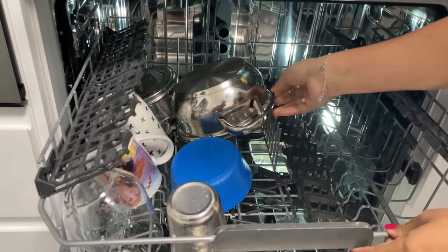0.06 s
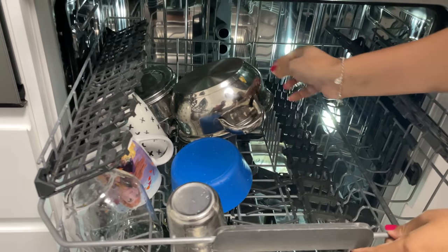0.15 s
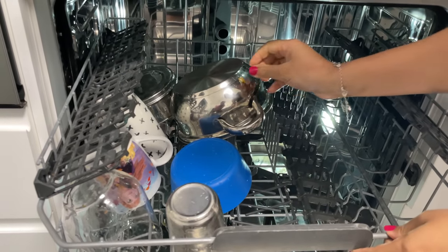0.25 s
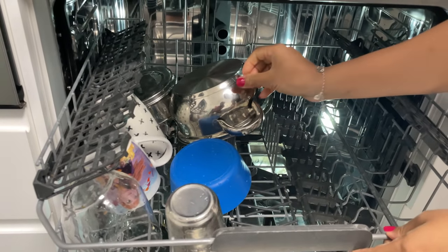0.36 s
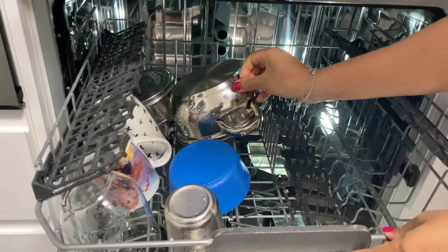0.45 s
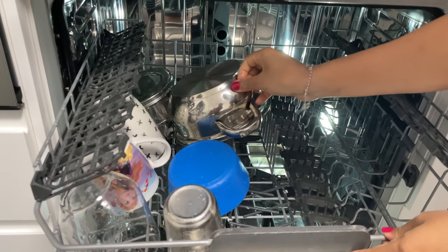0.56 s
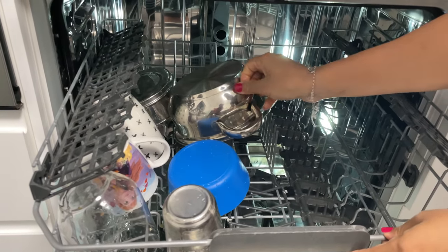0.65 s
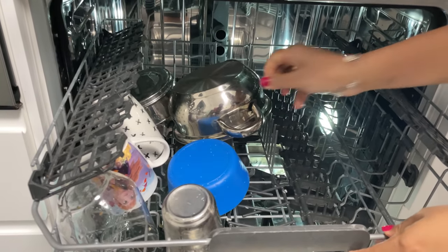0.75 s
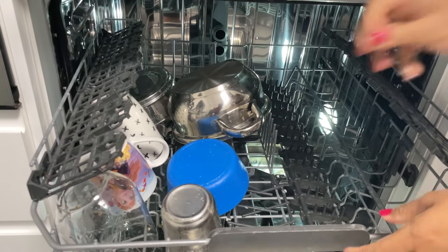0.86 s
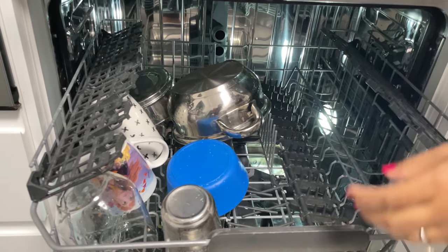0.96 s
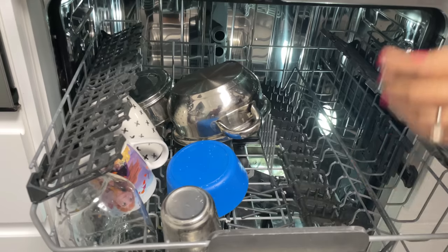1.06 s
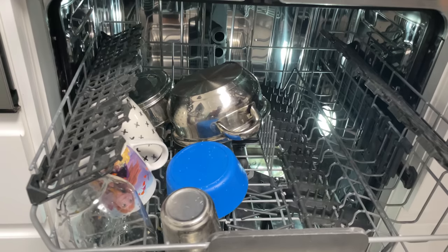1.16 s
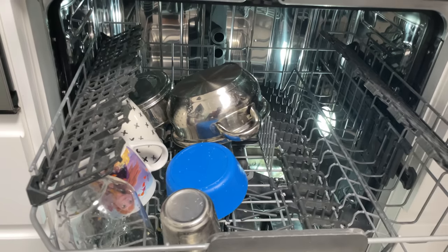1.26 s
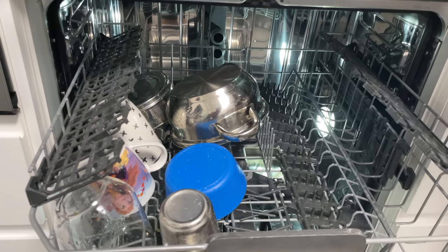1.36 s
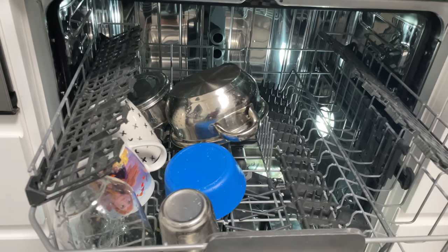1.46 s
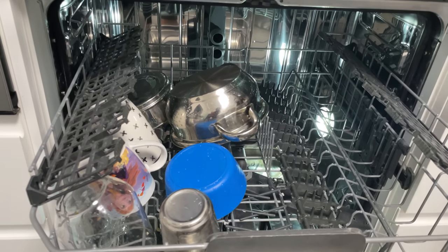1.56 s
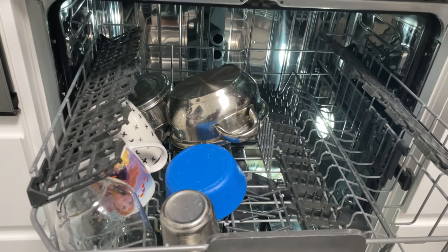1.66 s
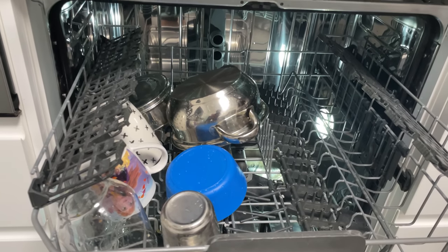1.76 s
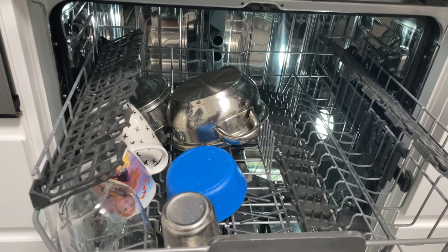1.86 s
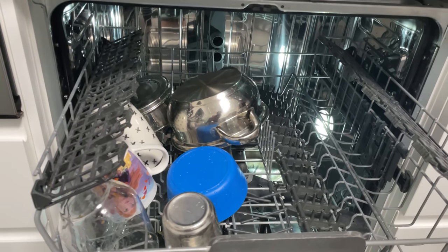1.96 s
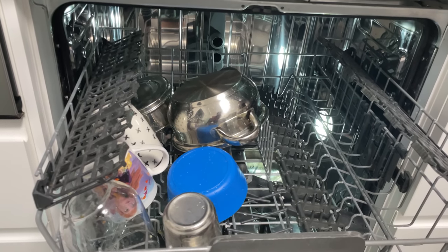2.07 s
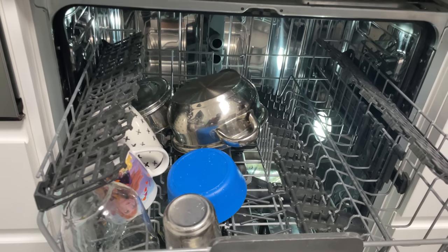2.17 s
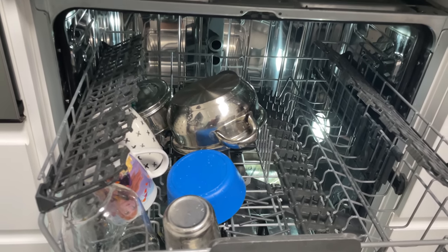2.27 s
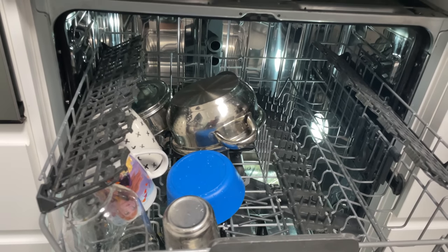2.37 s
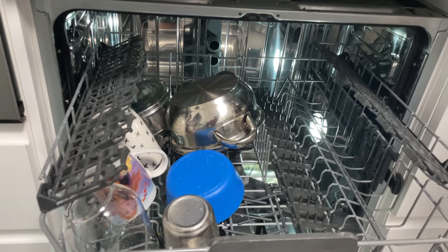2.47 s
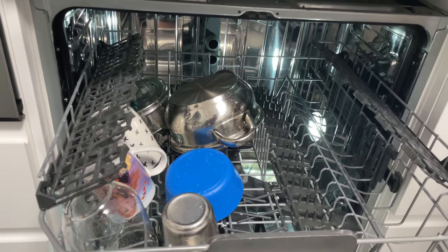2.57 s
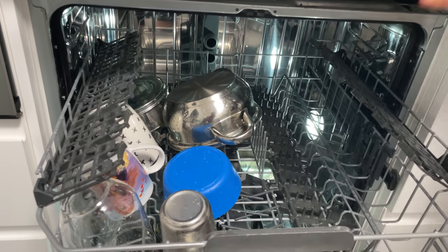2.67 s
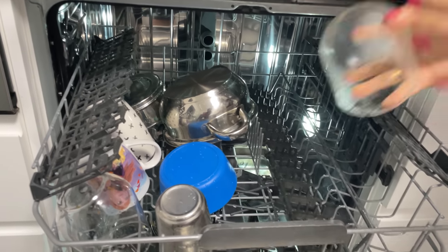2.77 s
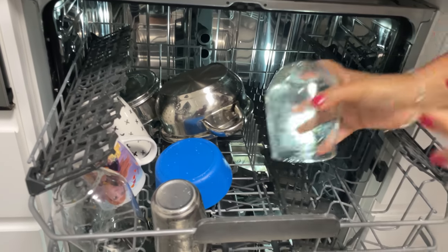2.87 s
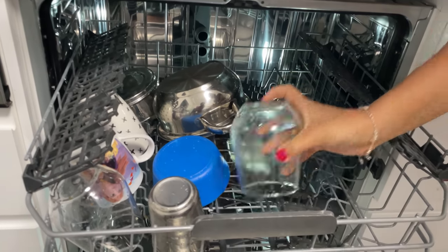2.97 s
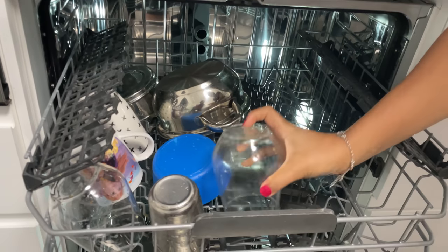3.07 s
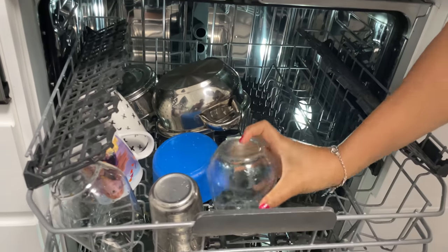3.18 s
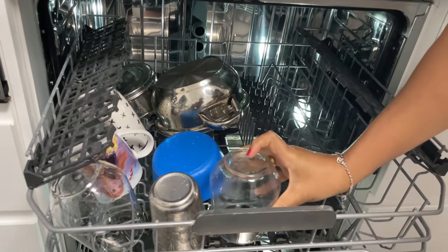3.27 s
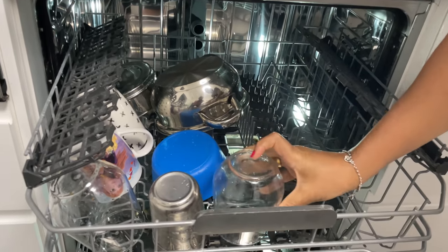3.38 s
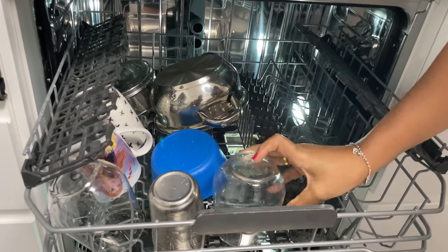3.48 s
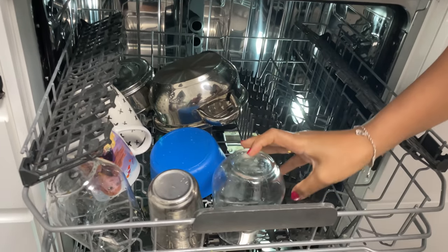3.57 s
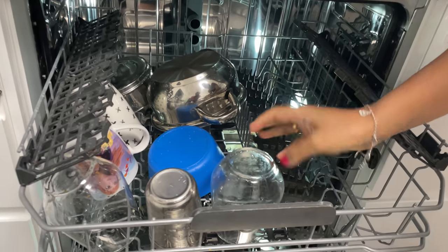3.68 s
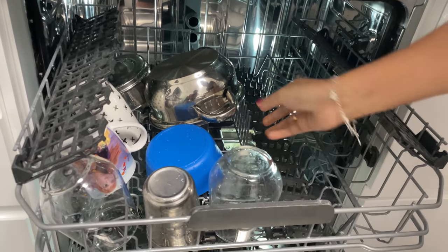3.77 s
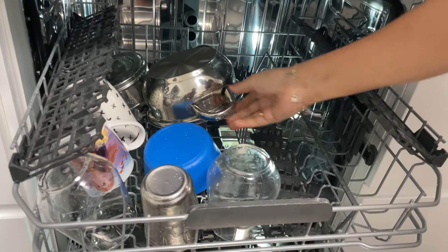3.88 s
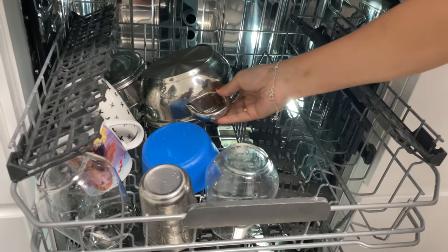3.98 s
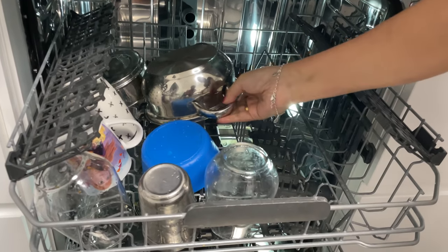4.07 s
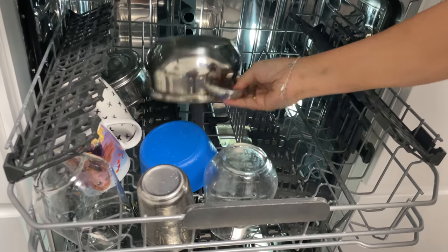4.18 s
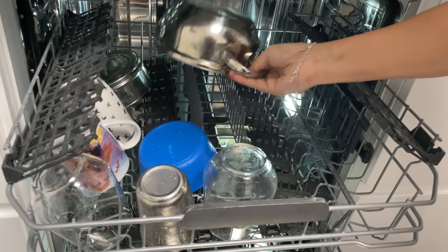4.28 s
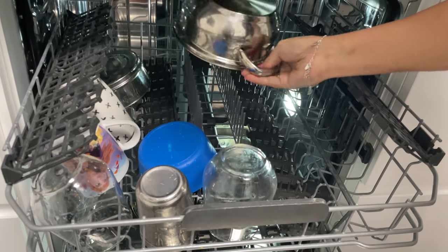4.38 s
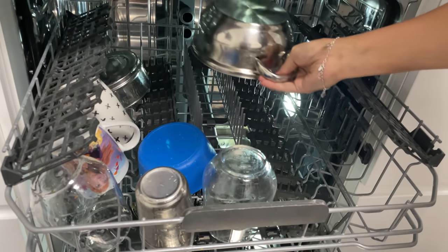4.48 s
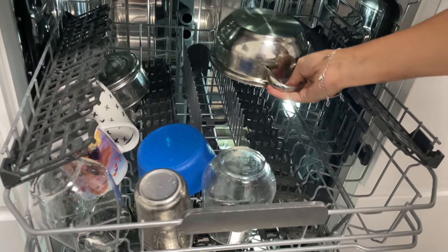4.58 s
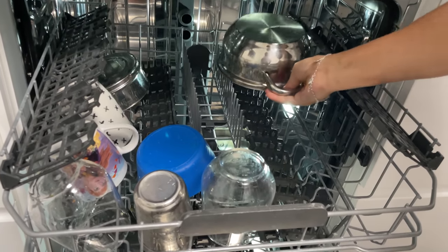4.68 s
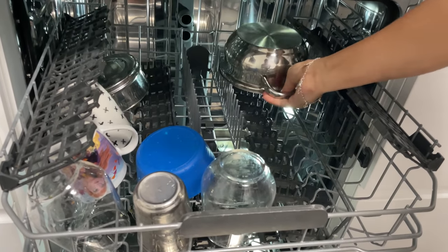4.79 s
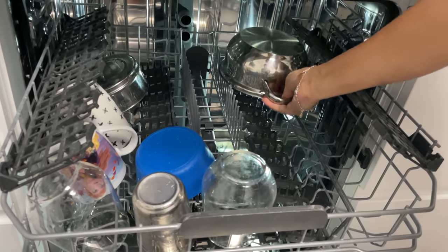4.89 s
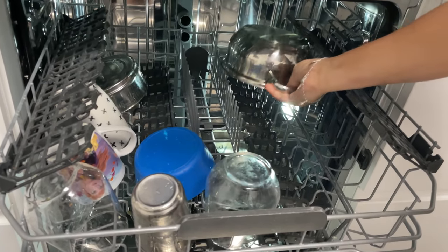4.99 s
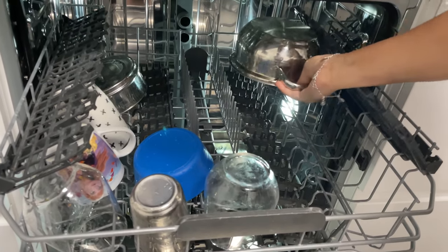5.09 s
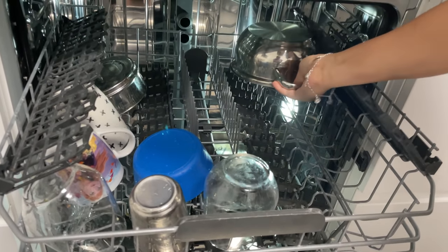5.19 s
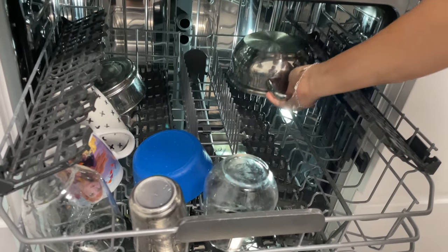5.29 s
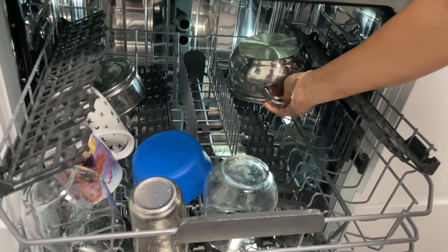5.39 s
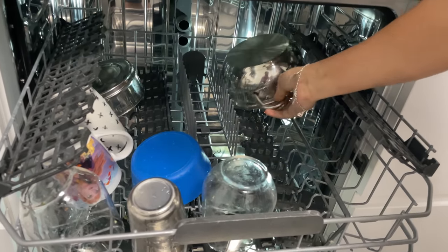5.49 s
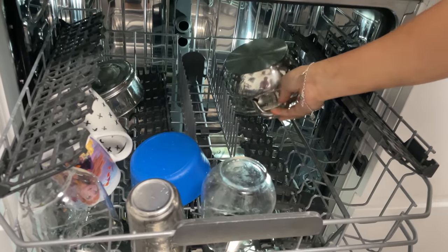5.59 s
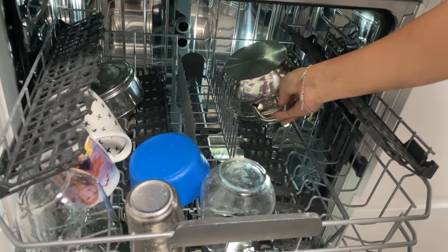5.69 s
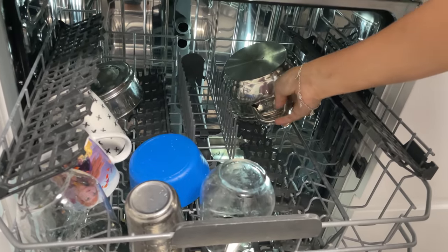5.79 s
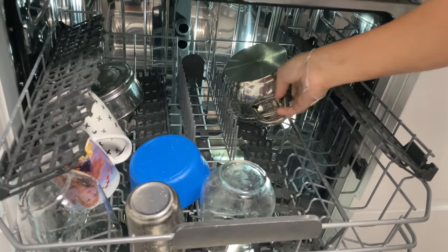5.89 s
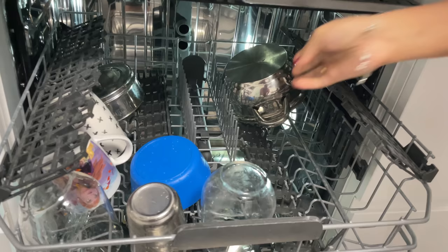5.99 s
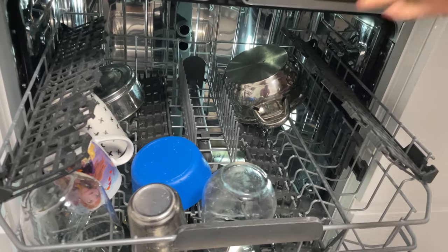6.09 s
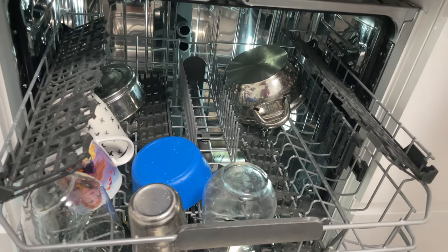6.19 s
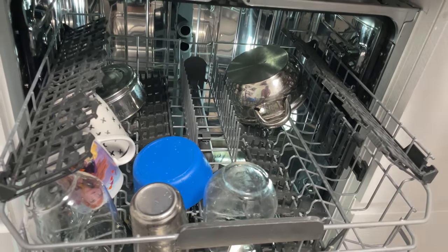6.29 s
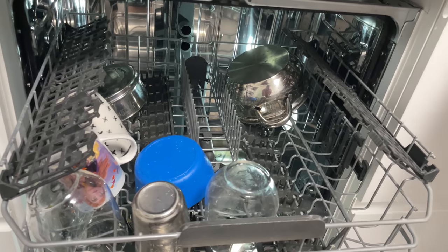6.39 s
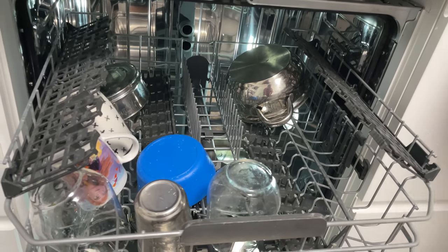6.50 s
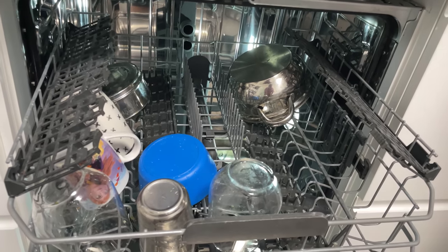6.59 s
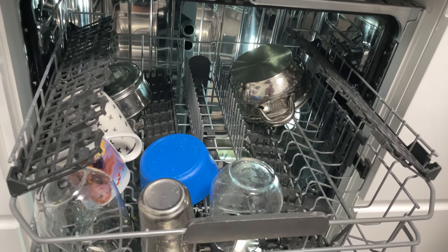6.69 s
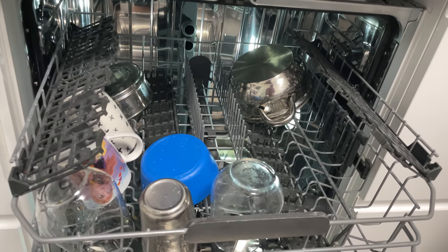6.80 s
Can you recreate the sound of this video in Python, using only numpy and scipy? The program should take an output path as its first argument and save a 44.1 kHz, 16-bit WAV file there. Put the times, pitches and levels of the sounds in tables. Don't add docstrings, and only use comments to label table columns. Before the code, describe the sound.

A close stereo phone microphone catches dishes being arranged in a wire rack: quiet pot knocks, a tiny bracelet clink, a muffled distant drawer, a sharp clatter of steel bowls, a short glassy double clink, then a dense run of pot bangs, scrapes and thuds with booming rails. Hands rub softly between; a dry rustle of rollers ends it in the short kitchen reverberation.

```python
import sys
import numpy as np
from scipy import signal
from scipy.fft import rfft, irfft, next_fast_len
from scipy.io import wavfile

SR = 44100
rng = np.random.default_rng(int(sys.argv[2]) if len(sys.argv) > 2 else 0)


def materialize(psi):
    bounded = np.clip(np.atleast_2d(psi).T, -1, 1)
    quanta = np.round(bounded * 32767).astype(np.int16)
    wavfile.write(sys.argv[1], SR, quanta)


def boost(x):
    u = np.asarray(x, float) / 20
    return 10 ** u


N = 302085

# tone_hz, level_db, ring_s (time to fall 60 dB)
POT_TILTED = [(536.7, -10, 0.3), (607, -9, 0.3), (727, -10, 0.44), (894, -11, 0.5), (1689, 1.5, 0.25),
              (2840, -15, 0.3), (3440, -11, 0.4), (3900, -16, 0.2), (4870, -24, 0.3), (5600, -20, 0.048)]
# tone_hz, level_db, ring_s
RIM_CLINK = [(3793, -3.5, .2), (7140, -5.5, .3), (8800, -3.5, .3), (10200, 0, 0.33), (11300, -2.5, .25),
             (12300, -10, .2)]
# pitch_hz, level_db
DULL = [(150, -53), (250, -23.5), (831, 1), (1000, -14.5), (3460, -19), (7440, -66), (10900, -37.5),
        (16000, -94)]
# pitch_hz, level_db
DRY = [(150, -35), (250, -8.5), (910, -6), (1800, -2.5), (3620, -8.5), (5410, -9), (13600, -20),
       (16200, -63)]
# pitch_hz, level_db
HEAVY = [(180, -13.5), (1490, -10.5), (1690, -0.5), (2310, -14), (3460, -9), (5800, -26.5), (12500, -30),
         (16200, -83)]
# pitch_hz, level_db
SHARP = [(120, -31), (200, -8), (856, -8), (2300, -6), (3400, -11), (6500, -8), (11000, -8), (16200, -50)]


def along(points, hz):
    f, v = np.transpose(points)
    return np.interp(np.log(hz + 1), np.log(f + 1), v)


def unit(x):
    return x / np.sqrt(np.mean(x ** 2) + 1e-20)


def filtered(x, response):
    m = next_fast_len(x.shape[-1] + 4096)
    spectrum = rfft(x, m) * response(np.fft.rfftfreq(m, 1 / SR))
    return irfft(spectrum, m)[..., :x.shape[-1]]


def pair(length, colour):
    # pitch_hz, likeness (0 to 1)
    likeness = [(60, 0.94), (150, 0.91), (380, 0.58), (950, 0.068), (2400, 0.2), (6000, 0.26), (9000, 0.3),
                (12500, 0.51)]

    def mid_side(hz):
        turn = np.arccos(np.clip(along(likeness, hz), 0, 1)) / 2
        return colour(hz) * [np.cos(turn), np.sin(turn)]

    mid, side = filtered(rng.standard_normal((2, length)), mid_side)
    return unit(np.array([mid + side, mid - side]))


def dying(noise, t60):
    hz, t, z = signal.stft(noise, SR, nperseg=128)
    decay = np.exp(-np.log(1000) * t / t60(hz)[:, None])
    return signal.istft(z * decay, SR, nperseg=128)[1][..., :noise.shape[-1]]


def grit(length, rate, depth_db):
    knots = rng.standard_normal(int(length * rate / SR) + 4)
    wander = np.interp(np.arange(length) * rate / SR, np.arange(len(knots)), knots)
    return unit(boost(depth_db * wander))


def resonances(modes):
    def response(f):
        return sum((-1) ** k * boost(db) * 1j * f * width / (centre * centre - f * f + 1j * f * width)
                   for k, (centre, width, db) in enumerate(modes))
    return response


def echo(x, wet_db):
    # pitch_hz, fade_s (60 dB)
    kitchen = [(200, 0.92), (1000, 0.54), (4000, 0.57), (9000, 0.4), (14000, 0.26)]
    tail = dying(pair(SR // 2, np.ones_like), lambda hz: along(kitchen, hz))
    tail = np.pad(tail / np.linalg.norm(tail[0]), ((0, 0), (int(.004 * SR), 0)))
    return boost(wet_db) * signal.fftconvolve(x[None], tail, axes=1)


def clatter(contacts, modes, colour, pan_db, wet_db, damping, rise, wiry_db=6, split=.003, early=.78, crack=0):
    # pitch_hz, times_life
    rattle_fade = [(300, 1.42), (2000, 1.166), (6000, 0.91), (13000, 0.98)]
    crack_s = .005
    out = np.zeros((2, N + SR))
    t = np.arange(SR * 9 // 25, dtype=np.float32) / SR
    hz, level_db, t60 = np.transpose(modes).astype(np.float32)[:, :, None]
    turn, neper = np.float32(2 * np.pi), np.float32(np.log(1000))

    wires_hz = np.linspace(0, 16400, 600)
    wires_db = wiry_db * wires_hz / (wires_hz + 3000) * rng.standard_normal(600)

    def shade(f):
        return boost(along(colour, f) + np.interp(f, wires_hz, wires_db))

    centre = np.sin(turn * hz * t)
    struck = np.exp(-neper * t / (damping * np.minimum(t60, 1.2)))
    struck = struck + early * np.exp(-neper * t / 0.024)
    shape = (1 - np.exp(-t / rise)) * np.cos(np.pi / 2 * (t / t[-1]) ** 1.3)
    pan = np.array([[pan_db], [-pan_db]]) / 2
    for s, db, life, ring_db in contacts:
        draw = np.clip(rng.standard_normal((4, *hz.shape)), -2, 2).astype(np.float32)
        split_hz = (8 + split * hz) * np.abs(draw[:2]) * [[[1]], [[-1]]]
        beside = np.sin(turn * (hz + split_hz).astype(np.float32) * t).sum(0)
        strength = boost(ring_db - 14 + level_db - level_db.max() + 1.5 * draw[2])
        rings = strength * struck * (centre + 0.62 * beside)
        lean = boost(2.2 * draw[3]).T[0]
        ringing = grit(len(t), 70, 2.2) * [lean @ rings, (1 / lean) @ rings]

        noise = dying(pair(len(t), shade), lambda f: max(life, .01) * along(rattle_fade, f))
        rattle = boost(-7.5) * grit(len(t), 300, 3.5) * noise
        direct = ((1 + crack * np.exp(-t / crack_s)) * rattle + ringing) * shape
        out[:, round((s - rise) * SR):][:, :len(t)] += boost(db + pan) * direct
    first = round((contacts[0][0] - rise) * SR)
    last = round(contacts[-1][0] * SR) + len(t)
    tail = echo(out[0, first:last], wet_db)[:, :N + SR - first]
    out[:, first:first + tail.shape[1]] += tail
    return out[:, :N]


def hum():
    # pitch_hz, level_db
    hum_colour = [(22, -31), (38, 1.5), (241, -14.5), (852, -14.5), (1500, -24.5), (8080, -38),
                  (12700, -30), (14500, -64.5)]
    return boost(-60.5) * pair(N, lambda f: boost(along(hum_colour, f)))


def rack():
    # peak_s, level_db
    shakes = [(.02, -42.5), (.17, -39), (.72, -43.5), (1.78, -44), (1.88, -32.5), (2.12, -44.5),
              (2.279, -43), (2.85, -56), (3.1, -56.5), (3.352, -33.5), (3.58, -41.5), (3.78, -45.5),
              (4.05, -43.5), (4.17, -36), (4.32, -36), (4.432, -19), (4.702, -38.5), (4.86, -30.5),
              (5.07, -34.5), (5.22, -37.5), (5.42, -36.5), (5.64, -35), (5.8, -38.5), (6.649, -51),
              (6.8, -47.5)]
    # pitch_hz, width_hz, level_db
    rails = [(85.2, 17, -11), (52.5, 20, -16.5)]
    # pitch_hz, width_hz, level_db
    panels = [(124.3, 33, -1), (170.6, 57, 0), (246, 240, -4)]
    rise_s, rails_t60_s, panels_t60_s, panels_db = .015, 0.79, 0.42, -2
    s, db = np.transpose(shakes)[:, :, None]
    late = np.arange(0, N, 64) / SR - s

    def swell(t60):
        fall = np.maximum(late / t60, -late / rise_s / 6)
        energy = np.sum(boost(2 * db - 120 * fall), 0)
        return np.interp(np.arange(N) / SR, late[0] + s[0], np.sqrt(energy))

    boom = pair(N, lambda f: resonances(rails)(f) ** 2)
    thud = pair(N, lambda f: resonances(panels)(f) ** 2)
    return swell(rails_t60_s) * boom + boost(panels_db) * swell(panels_t60_s) * thud


def thumps():
    # start_s, peak_db, pitch_hz, fade_s (60 dB)
    hits = [
        (0.15, -30, 82.5, .27),
        (0.721, -34, 78, .27),
        (1.86, -16.5, 130.3, .3),
        (2.255, -27, 130.6, .27),
        (4.423, -16, 340, .08),
        (4.426, -12, 185, .12),
        (4.441, -7, 98, .25),
        (5.635, -27.5, 86.2, .27),
        (5.72, -28, 290, .2),
        (6.668, -33, 85, .15),
    ]
    out, t = np.zeros(N + SR), np.arange(SR // 2) / SR
    for s, db, hz, t60 in hits:
        cycles = hz * (.88 * t + .12 * .05 * (1 - np.exp(-t / 0.055)))
        swing = boost(db - 60 * t / t60) * (1 - np.exp(-t / 0.0062)) * np.sin(2 * np.pi * cycles)
        out[round(s * SR):][:len(t)] += swing
    return out[:N]


def shuffle():
    # peak_s, swell_s, fade_s (both over 30 dB), level_db, brightness_db
    strokes = [(0.0, .1, 0.01, -38, -6), (0.55, 0.29, 1.1, -66.5, 11), (0.86, 0.64, 0.48, -56, -3),
               (1.68, 0.23, 1, -52, 0), (1.84, .25, 0.44, -42, 0), (2.92, 0.25, 0.5, -49.5, 2),
               (4.58, 0.4, 1.1, -35, -3.5), (5.2, .3, 0.46, -44, -2), (6.1, 0.42, .8, -60, -4),
               (6.62, 0.09, .5, -53, -4), (6.84, .3, 2, -37.5, 2)]
    now = np.arange(N) / SR
    low = pair(N, lambda f: boost(along(DRY, f)) / (1 + (f / 6000) ** 4))
    high = pair(N, lambda f: boost(along(DRY, f)) / (1 + (7500 / (f + 1)) ** 4))
    dark, bright = np.zeros((2, N))
    for s, swell, fade, db, tilt_db in strokes:
        stroke = boost(db - 4 - 30 * np.maximum((s - now) / swell, (now - s) / fade))
        dark = dark + boost(-tilt_db) * stroke
        bright = bright + boost(tilt_db - 9) * stroke
    return grit(N, 300, 2.5) * (dark * low + bright * high)


def far_drawer():
    # start_s, peak_db, rattle_s, ring_db
    knocks = [
        (1.404, -33, 0.12, -7),
        (1.439, -43, 0.066, -12),
    ]
    # tone_hz, level_db, ring_s
    wood = [(400, -6, .12), (980, 0, .1), (1750, 0, .15), (2100, -4, .1)]
    # pitch_hz, level_db
    muffled = [(150, -32), (400, -6), (884, -2), (1300, -10), (1800, 2), (3400, -7), (4500, -24),
               (8270, -48)]
    return clatter(knocks, wood, muffled, wiry_db=3, pan_db=0.0, wet_db=-1.0, damping=.5, rise=0.0018)


def bracelet():
    # start_s, peak_db, rattle_s, ring_db
    clinks = [
        (.629, -53, 0.026, 5.4),
    ]
    # tone_hz, level_db, ring_s
    link = [(4700, 0, 0.24)]
    return clatter(clinks, link, DRY, pan_db=4.0, wet_db=-9, damping=1.0, rise=0.0021)


def wire_tap():
    # start_s, peak_db, rattle_s, ring_db
    taps = [
        (0.948, -36, 0.06, -5),
    ]
    # tone_hz, level_db, ring_s
    prong = [(2000, 0, .06), (3250, -3, .04), (5100, -5, .04)]
    return clatter(taps, prong, HEAVY, pan_db=0.0, wet_db=3.5, damping=.8, rise=.0007, wiry_db=2.5)


def rollers():
    # start_s, peak_db, rattle_s, ring_db
    ticks = [
        (2.878, -26.5, 0.016, -23),
        (2.893, -32, .03, -24),
        (2.9957, -26, 0.014, -22),
        (3.138, -38, .02, -26),
        (6.765, -26, 0.026, -25),
    ]
    # start_s, peak_db, rattle_s, ring_db
    rustles = [
        (6.603, -38, 0.22, -30),
        (6.64, -41, .15, -30),
    ]
    # tone_hz, level_db, ring_s
    roller = [(5410, 2, 0.02), (2200, 0, 0.024)]
    # pitch_hz, level_db
    papery = [(200, -8), (800, -4), (2600, -16), (4000, -20), (5400, 4), (7000, -12), (13600, -22),
              (16200, -62)]
    return (clatter(ticks, roller, DRY, pan_db=0.0, wet_db=6.5, damping=0.34, rise=.0005, wiry_db=2.5)
            + clatter(rustles, roller, papery, pan_db=2.0, wet_db=-2, damping=.4, rise=.004, wiry_db=5))


def resting_pots():
    # start_s, peak_db, rattle_s, ring_db
    knocks = [
        (0.005, -31, 0.19, 0),
        (0.034, -30.5, 0.13, 3),
        (0.046, -34.5, 0.14, 3.5),
        (0.098, -30.5, 0.15, -2),
        (0.122, -33.5, 0.1, 0),
        (0.146, -32.5, 0.097, -3),
    ]
    # tone_hz, level_db, ring_s
    nested = [(517, -10, 0.5), (650, -3, 0.3), (750, -3, 0.3), (880, 0, 0.28), (1680, -6, 0.35),
              (1780, -6, .3), (2008, -11, .3), (2955, -16, .4), (3338, -11, .35), (3612, -16, 1.4),
              (3989, -14, .4), (4457, -12, .35), (4850, -19, .3), (6250, -16, .25)]
    # start_s, peak_db, rattle_s, ring_db
    nudges = [
        (0.68, -24, 0.13, 2.5),
        (0.699, -24, 0.063, -1.5),
    ]
    # tone_hz, level_db, ring_s
    resting = [(886, -6.5, 0.37), (1700, -3, 0.026), (1820, -29, 0.13), (2435, -24.5, 0.15),
               (2740, -29.5, 0.39), (3520, -30.5, 1.4)]
    return (clatter(knocks, nested, DRY, pan_db=0.2, wet_db=-2.5, damping=0.7, rise=0.0043, wiry_db=4)
            + clatter(nudges, resting, DULL, pan_db=-4.0, wet_db=-2.3, damping=0.52, rise=0.00059))


def steel_bowls():
    # start_s, peak_db, rattle_s, ring_db
    stacking = [(1.698, -33, 0.11, -17), (1.838, -26, .05, -10), (1.85, -7.5, 0.2, -5),
                (1.874, -11, 0.092, -6), (1.905, -17, .06, -3), (1.928, -16, .08, 3), (1.936, -13, 0.1, 3),
                (1.958, -15, .07, 2), (1.969, -18, 0.083, 2), (2.039, -25.5, 0.097, 4),
                (2.098, -30.5, 0.2, -4), (2.209, -33.5, 0.2, 0)]
    # tone_hz, level_db, ring_s
    bowl = [(2300, -14, 0.4), (2490, -13, 0.14), (3020, -24, 0.4), (4215, -2, 0.5), (4885, -18, 0.4),
            (6535, -14, 0.45), (7289, -21, 0.5), (7843, -13, .16), (8651, -19, .3), (9259, -17, .5),
            (10450, -20, .35), (11150, -14, .25), (12600, -17, .3), (13150, -19, .23)]
    # start_s, peak_db, rattle_s, ring_db
    settling = [
        (2.291, -21.5, 0.085, -3),
        (2.589, -51.5, 0.23, -3),
    ]
    # tone_hz, level_db, ring_s
    rim = [(940, -8, 0.38), (2300, -14, 0.7), (4195, -10, .8), (6480, -5, 0.3), (7230, -8, 0.28),
           (7800, -11, 0.25), (8700, -10, 0.3), (9609, -15, 0.27), (10580, -9, 0.3)]
    # pitch_hz, level_db
    bright = [(120, -41), (200, -8), (502, -6.5), (1790, -4), (9530, -11.5), (13000, -15), (16200, -102)]
    return (clatter(stacking, bowl, bright, pan_db=-0.9, wet_db=-1.5, damping=0.86, rise=0.0036)
            + clatter(settling, rim, bright, pan_db=-3, wet_db=-1.0, damping=0.66, rise=0.0018))


def glass():
    # start_s, peak_db, rattle_s, ring_db
    down = [
        (3.334, -5, 0.16, 1.5),
        (3.349, -9.5, 0.11, -1.5),
        (3.389, -14, 0.15, -10),
    ]
    # tone_hz, level_db, ring_s
    body = [(632, 3, 0.27), (900, -12.5, 0.5), (1300, -21.5, 0.6), (1780, -11, .25), (2293, -9, 0.45),
            (2692, -12, 0.4), (3050, -8, .04), (3359, -12, 0.45), (3542, -12, 0.21), (3914, -14.5, 0.31),
            (4230, -13, 0.25), (6514, -14, 0.3), (7219, -16, .23), (9100, -26.5, 0.24)]
    # pitch_hz, level_db
    glassy = [(120, -52), (200, -13), (433, -18), (630, -2), (1190, -20), (2310, -16), (12600, -29),
              (16200, -110)]
    # start_s, peak_db, rattle_s, ring_db
    tip = [
        (3.558, -10, 0.04, -7.5),
    ]
    # tone_hz, level_db, ring_s
    rim = [(1405, 0, 0.65), (1485, -2, .5), (2060, -8, .05), (2439, -13, 0.4), (2960, -5, 0.07),
           (3300, -12, .06), (3790, -6, 0.07), (4215, -18, .4), (5222, -19, 0.2), (6794, -21, 0.3)]
    # pitch_hz, level_db
    rimmy = [(120, -38), (300, -11.5), (800, -12), (1450, -5), (2310, -7.5), (4000, -10), (12600, -26.5),
             (16200, -100)]
    return (clatter(down, body, glassy, pan_db=3.0, wet_db=-7.0, damping=0.6, rise=0.0034)
            + clatter(tip, rim, rimmy, pan_db=1.5, wet_db=-6.5, early=3.0, split=.006, crack=.4,
                      damping=0.55, rise=0.00092))


def pot_lift():
    # start_s, peak_db, rattle_s, ring_db
    grip = [
        (4.02, -29, 0.15, 1),
    ]
    # start_s, peak_db, rattle_s, ring_db
    turning = [
        (4.216, -10, 0.085, 3),
        (4.223, -8.5, 0.085, 2.5),
        (4.275, -19, 0.081, -3.5),
        (4.358, -24, .08, -4),
    ]
    # tone_hz, level_db, ring_s
    turned = [(1626, -8.5, .3), (2433, -10, 0.12), (2673, 0, 0.08), (2799, -5, 0.2), (3435, -6, 0.13),
              (3950, -8, 0.15), (4000, -5, 0.15), (4320, -7, 0.12), (4452, -3, 0.1), (5020, -10, 0.16),
              (5566, -19, .4), (7068, -16.5, 0.18)]
    # start_s, peak_db, rattle_s, ring_db
    lifting = [
        (4.034, -29.5, 0.11, -6),
        (4.161, -18, 0.079, -6.5),
        (4.175, -3.5, 0.075, 1),
        (4.179, -6, .02, 0),
        (4.329, -22, 0.1, -10),
    ]
    # tone_hz, level_db, ring_s
    lifted = [(702, -9.5, 0.067), (1295, -3.5, 0.13), (1665, -1, 0.12), (3540, -13.5, 0.4),
              (4470, -5.5, 0.12), (5920, -9.5, 0.18), (7150, -12, 0.12), (7700, -16, 0.1),
              (9900, -13, 0.25), (10600, -12, 0.33), (11300, -10, 0.1)]
    # pitch_hz, level_db
    tinny = [(120, -60), (200, -16), (1600, -5), (4010, -3.5), (6200, -9), (8500, -24), (11500, -11),
             (14800, -36)]
    # start_s, peak_db, rattle_s, ring_db
    swing = [
        (4.418, -1.5, 0.097, -5.5),
    ]
    # tone_hz, level_db, ring_s
    held = [(904, 0, 0.9), (1696, -10, 0.25), (2799, -12, .9), (3418, -16, 0.4), (4253, -12, 0.45),
            (4926, -15, 0.6), (5857, -22, 0.6), (6573, -12, 0.6), (7983, -13, 0.24), (8629, -19, 0.5),
            (9512, -16, 0.4), (11440, -20, 0.4), (12260, -13, .15), (13290, -17, .17)]
    return (clatter(grip, POT_TILTED, DULL, pan_db=3.0, wet_db=-1.5, damping=0.43, rise=0.0048)
            + clatter(turning, turned, tinny, pan_db=3.5, wet_db=-3.5, damping=0.69, rise=.003, split=.012, early=1.5)
            + clatter(lifting, lifted, tinny, pan_db=1.0, wet_db=-2.5, damping=0.8, rise=.003)
            + clatter(swing, held, SHARP, early=1.2, crack=.4, pan_db=0.9, wet_db=-3.5, damping=0.89, rise=0.00099))


def pot_slide():
    # start_s, peak_db, rattle_s, ring_db
    graze = [
        (4.735, -27, .025, -16),
        (4.745, -33, .08, -14),
    ]
    # start_s, peak_db, rattle_s, ring_db
    sliding = [
        (4.823, -6.5, 0.1, -5),
        (4.83, -13, .05, -2),
        (4.839, -14, 0.05, -1.5),
        (4.85, -11, .05, -1),
        (4.983, -29, 0.07, -3),
        (5.009, -23, 0.04, -1),
        (5.02, -26, .04, -2),
    ]
    # tone_hz, level_db, ring_s
    slider = [(622, -3.5, .12), (905, -3.5, 0.48), (1695, -0.5, 0.14), (2700, -16, 0.4), (3420, -1, 0.35),
              (3800, -8, .25), (4420, -6.5, .12), (6490, -20.5, 0.34), (9100, -20, .2), (10100, -19.5, 0.2)]
    # start_s, peak_db, rattle_s, ring_db
    clink = [
        (4.863, -9, 0.08, -1),
    ]
    # start_s, peak_db, rattle_s, ring_db
    bumps = [
        (5.047, -11.5, 0.06, -6),
        (5.069, -14.5, 0.09, -4),
        (5.1, -24.5, .1, -6),
        (5.197, -30.5, 0.092, -8.5),
    ]
    # tone_hz, level_db, ring_s
    bumped = [(907, -9.5, 0.54), (1685, -1.5, 0.12), (2293, -7, 0.36), (3400, -7.5, 0.45), (4016, -10, 0.3),
              (4210, -5, 0.15), (6550, -9, 0.36), (7200, -14, 0.3), (8667, -16.5, 0.27), (9545, -10, 0.15),
              (12600, -8, 0.08)]
    # pitch_hz, level_db
    hollow = [(120, -28), (330, -11), (700, -4), (3400, -11.5), (5800, -19), (10100, -14), (13500, -19),
              (16200, -45)]
    return (clatter(graze, RIM_CLINK, SHARP, pan_db=0.0, wet_db=-3, damping=.6, rise=.0007, wiry_db=4)
            + clatter(sliding, slider, hollow, pan_db=0.0, wet_db=-3.5, damping=0.61, rise=0.0023)
            + clatter(clink, RIM_CLINK, hollow, pan_db=-0.2, wet_db=-3.5, damping=0.7, rise=0.002, split=.015)
            + clatter(bumps, bumped, hollow, pan_db=-0.5, wet_db=-3.5, damping=0.71, rise=0.002, split=.007))


def pot_seat():
    # start_s, peak_db, rattle_s, ring_db
    touch = [
        (5.32, -8, 0.096, -1.4),
    ]
    # tone_hz, level_db, ring_s
    touching = [(830, -5.5, 0.11), (1630, -4, .1), (1830, -0.5, .06), (2837, -13, 0.28), (3300, -6.5, 0.12),
                (3467, -9, .3), (3760, -9, 0.22), (4888, -18, .2)]
    # start_s, peak_db, rattle_s, ring_db
    landing = [
        (5.377, 0, 0.05, -2.5),
        (5.38, -1, .04, -2),
        (5.472, -27, .07, -1),
        (5.479, -23.5, 0.07, -0.91),
        (5.52, -27.5, .08, -1),
        (5.544, -26.5, 0.12, -1.3),
    ]
    # start_s, peak_db, rattle_s, ring_db
    rocks = [
        (5.607, -20, 0.1, 1.5),
        (5.627, -17.5, 0.07, -2),
        (5.684, -28, 0.088, -2),
    ]
    # tone_hz, level_db, ring_s
    rocking = [(641, -9.5, 0.299), (720, -4.5, 0.18), (910, -7.5, 0.67), (1292, -12.5, 0.2),
               (1701, -1, 0.5), (2805, -13.5, .5), (3370, -8, 0.2)]
    # start_s, peak_db, rattle_s, ring_db
    drop = [
        (5.715, -2, 0.1, -4),
        (5.722, -10, .08, -3),
        (5.744, -14, 0.1, -3),
    ]
    # tone_hz, level_db, ring_s
    seated = [(530, -12, 0.4), (620, -10, .25), (840, -7, 0.32), (908, -4, 0.55), (1701, -1, 0.14),
              (2114, -13, 0.25), (2460, -15, 0.45), (3004, -16, 0.28), (3365, -12, 0.35), (3601, -10, 0.33),
              (3860, -11, 0.55), (4199, -12, 0.22), (4888, -18, 0.45), (5512, -23, 0.35)]
    # pitch_hz, level_db
    weighty = [(180, -13.5), (560, -6), (1400, -11), (1690, -2), (2310, -12), (3900, -10), (6500, -26),
               (11000, -24), (16200, -83)]
    return (clatter(touch, touching, HEAVY, pan_db=-0.5, wet_db=-5, damping=0.66, rise=.004, split=.007)
            + clatter(landing, POT_TILTED, HEAVY, early=2.5, split=.006, pan_db=-2.0, wet_db=-5.5,
                      damping=.45, rise=.003)
            + clatter(rocks, rocking, HEAVY, pan_db=0.0, wet_db=-5, damping=.7, rise=0.0043)
            + clatter(drop, seated, weighty, early=1.2, pan_db=0.7, wet_db=-6, damping=0.87, rise=0.0031))


def scene():
    background = hum() + rack() + thumps() + shuffle()
    small_sounds = far_drawer() + bracelet() + wire_tap() + rollers()
    vessels = resting_pots() + steel_bowls() + glass()
    moved_pot = pot_lift() + pot_slide() + pot_seat()
    return background + small_sounds + vessels + moved_pot


def low_pass(x):
    return signal.sosfilt(signal.butter(12, 16400, fs=SR, output="sos"), x)


def record(dry):
    # pitch_hz, lead_radians
    lead = [(200, 0), (400, -.3), (1500, -.7), (3000, -1.5), (9000, -1.6), (12500, -2.2)]
    # pitch_hz, difference_db
    balance = [(60, 1), (150, -1.5), (380, 0.5), (950, 1), (2380, 0.5), (5980, 2.5), (15000, -2)]
    top_hz, bottom_hz = 14600, 46
    sides = np.array([[.5], [-.5]])

    def port(f):
        colour = boost(sides * along(balance, f)) * np.exp(1j * sides * along(lead, f))
        return colour / (1 + (f / top_hz) ** 24) / (1 + (bottom_hz / (f + 1)) ** 4)

    ports = filtered(dry, port)
    ceiling = ports / (1 + np.abs(ports) ** 6) ** (1 / 6)
    return low_pass(ceiling)


dry = scene()
out = record(dry)
materialize(out)
```